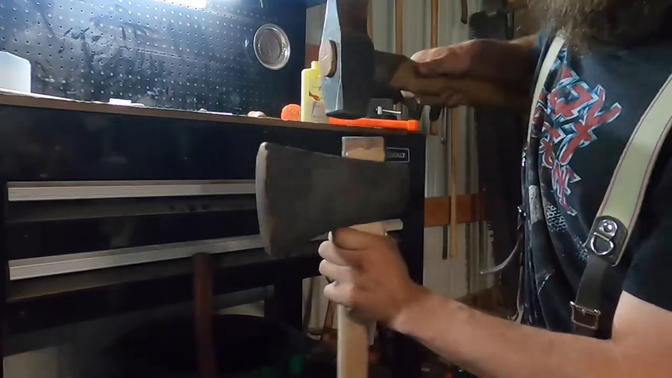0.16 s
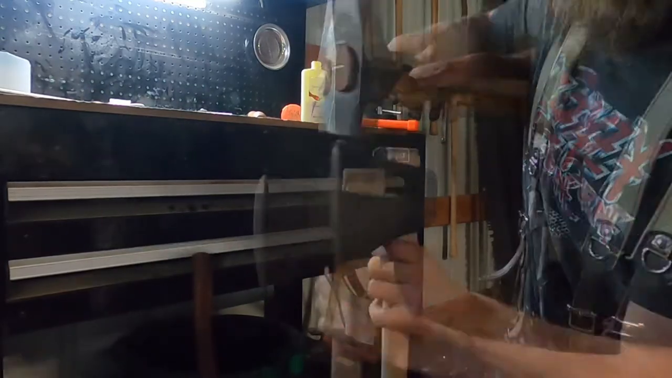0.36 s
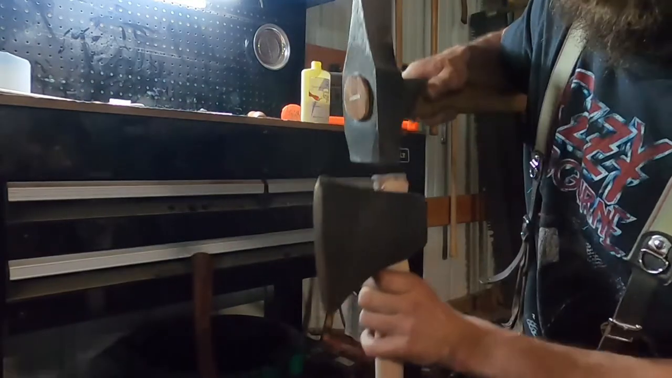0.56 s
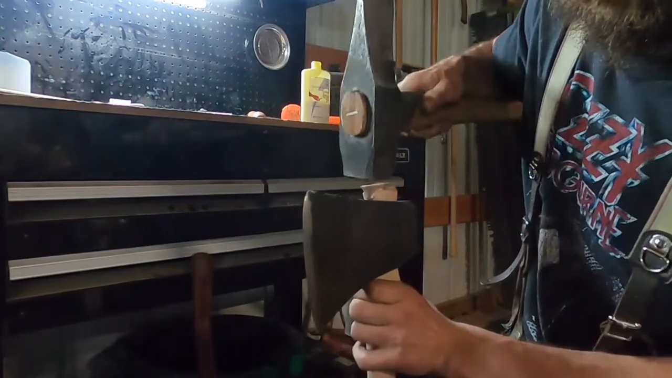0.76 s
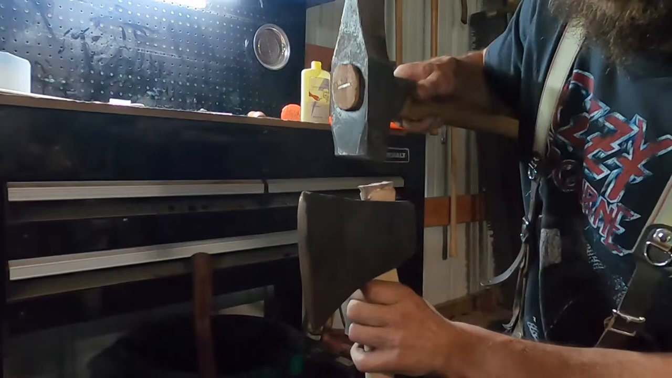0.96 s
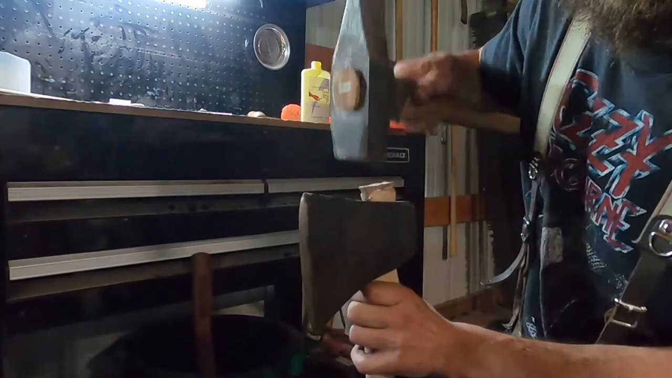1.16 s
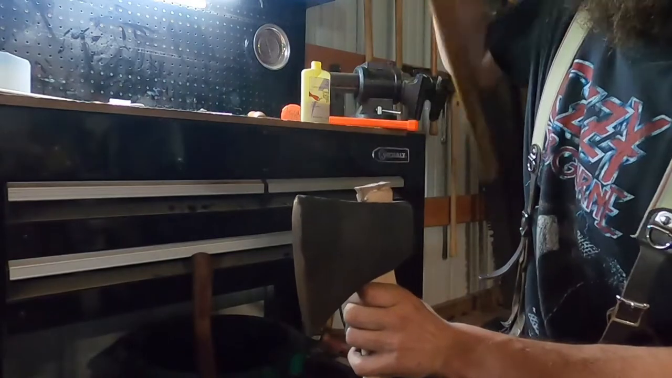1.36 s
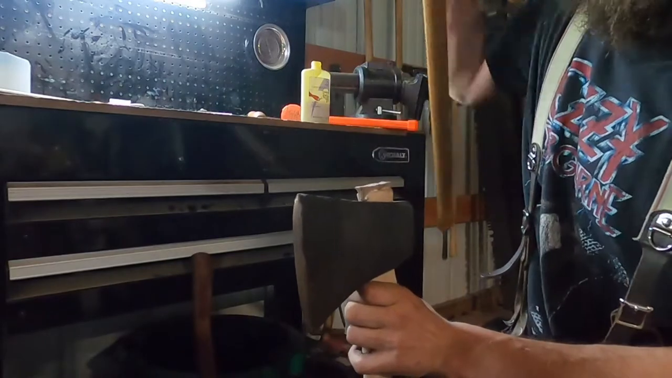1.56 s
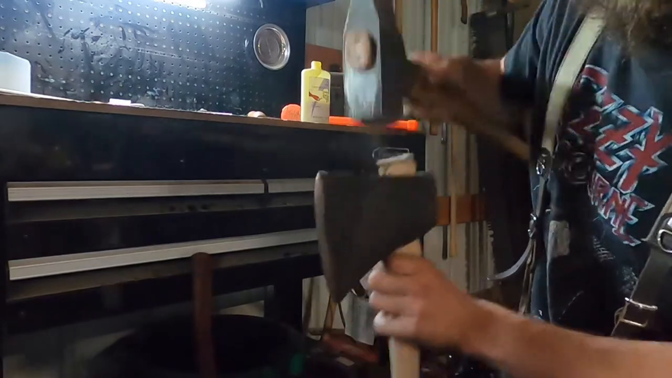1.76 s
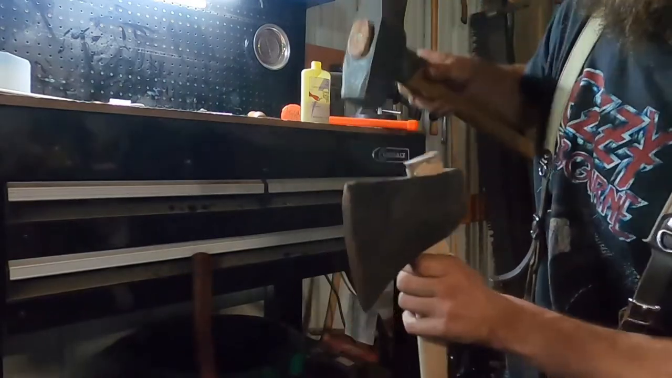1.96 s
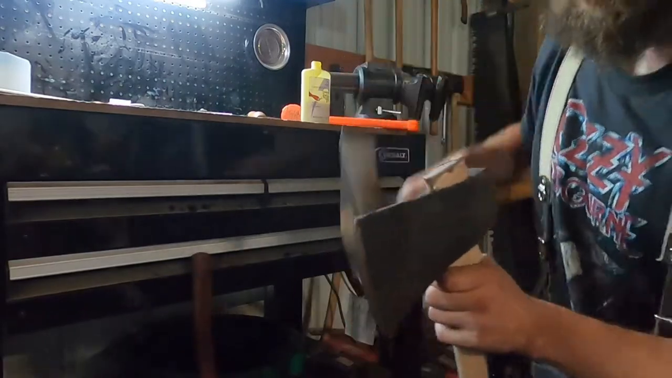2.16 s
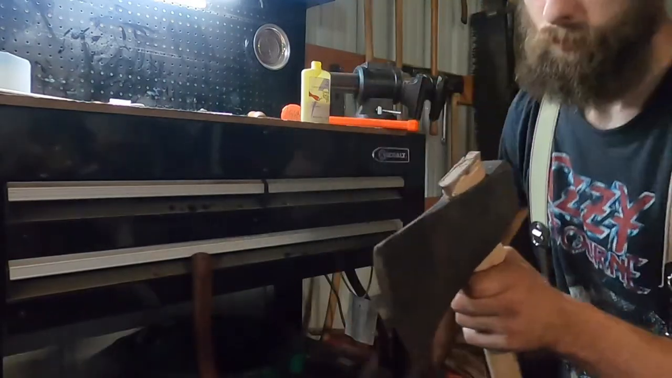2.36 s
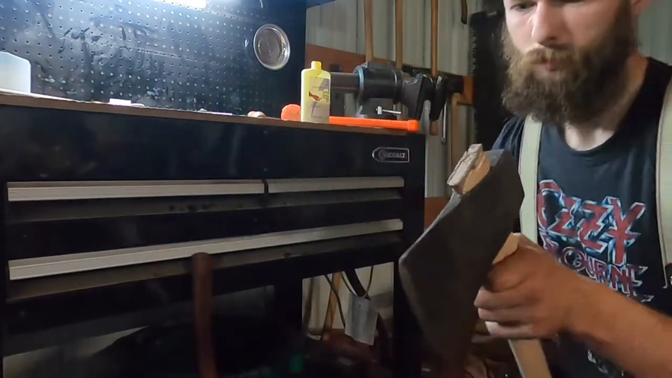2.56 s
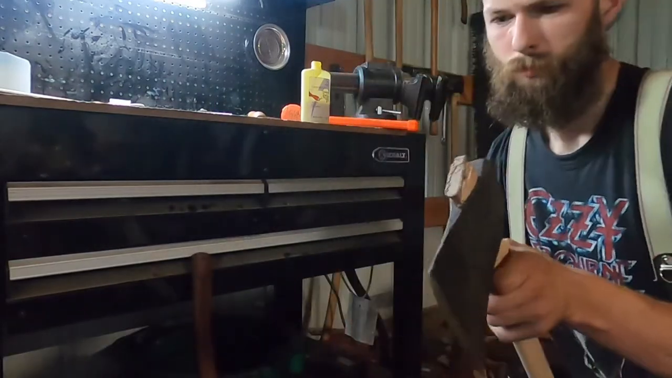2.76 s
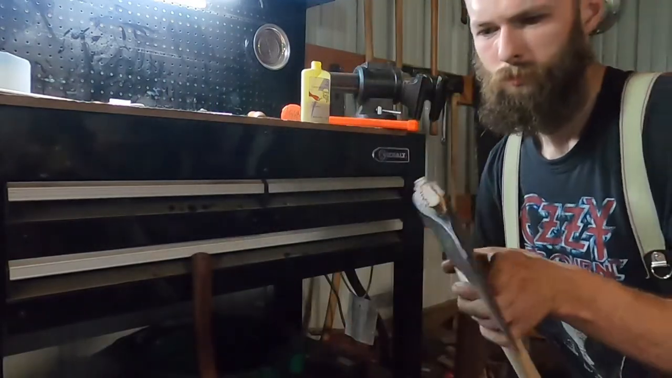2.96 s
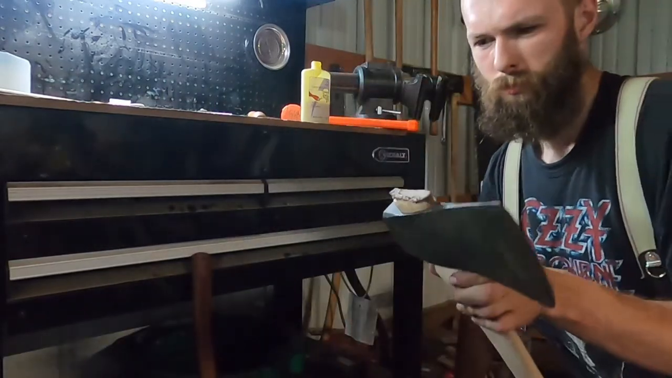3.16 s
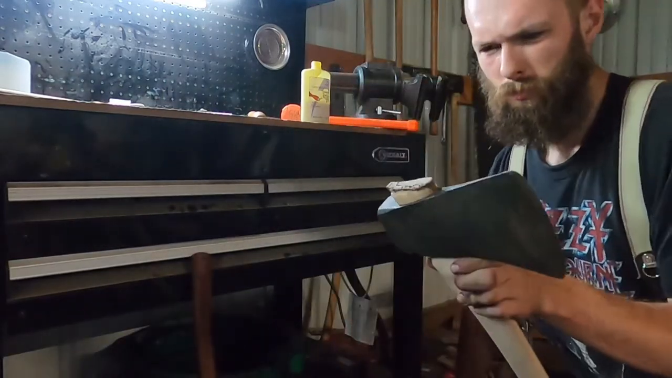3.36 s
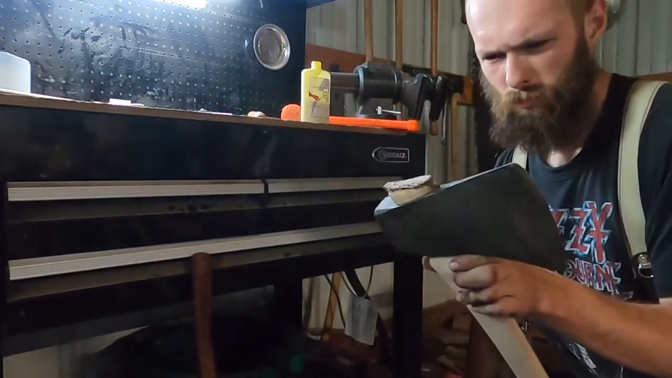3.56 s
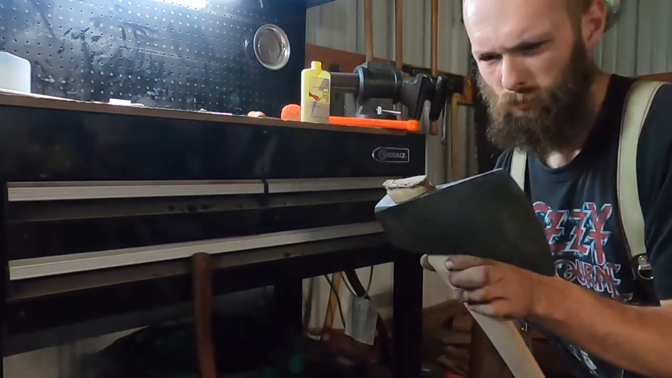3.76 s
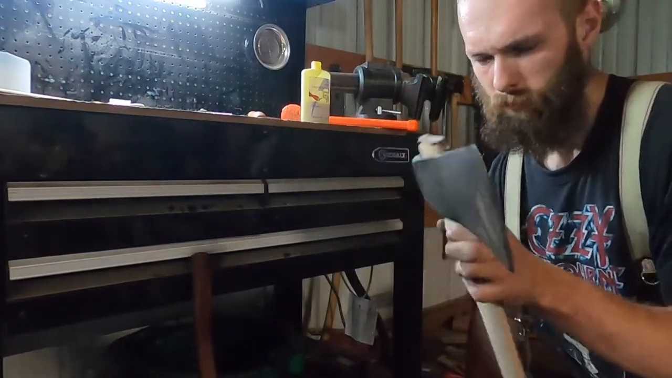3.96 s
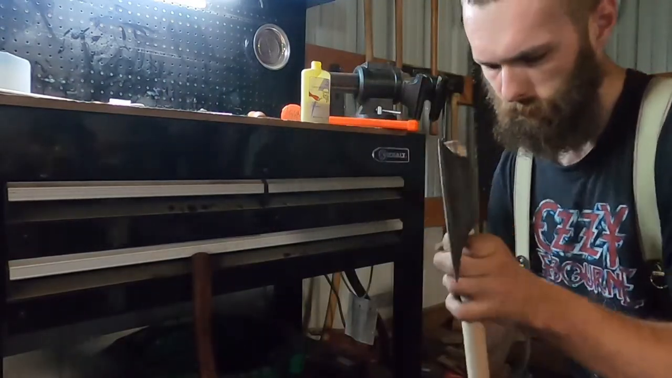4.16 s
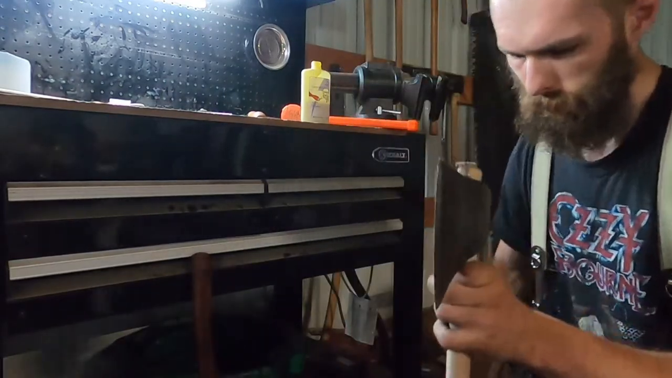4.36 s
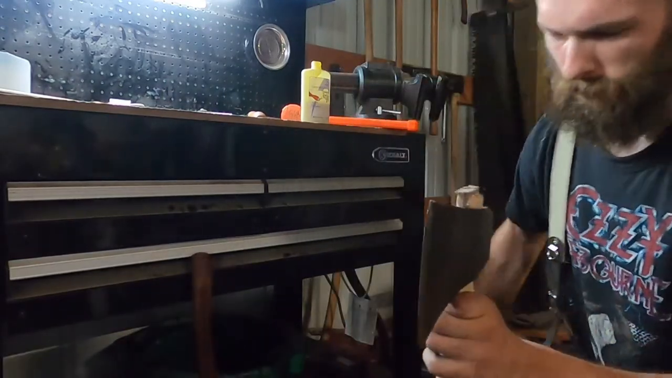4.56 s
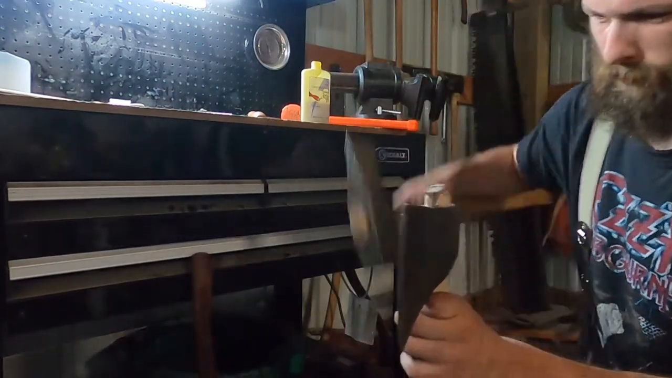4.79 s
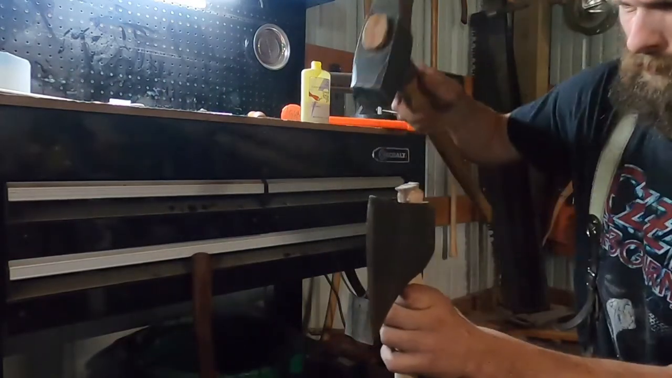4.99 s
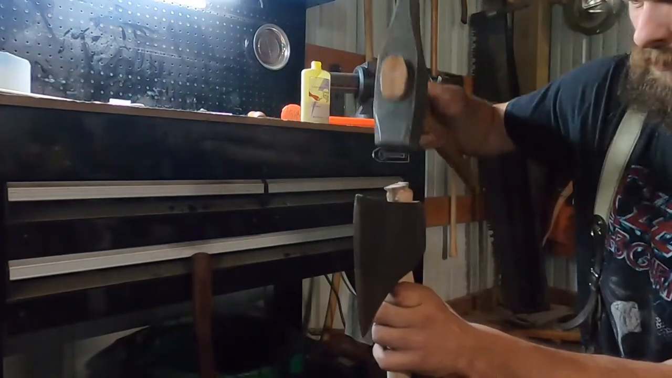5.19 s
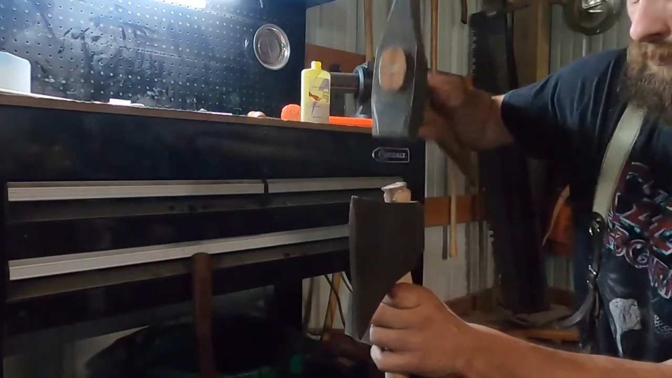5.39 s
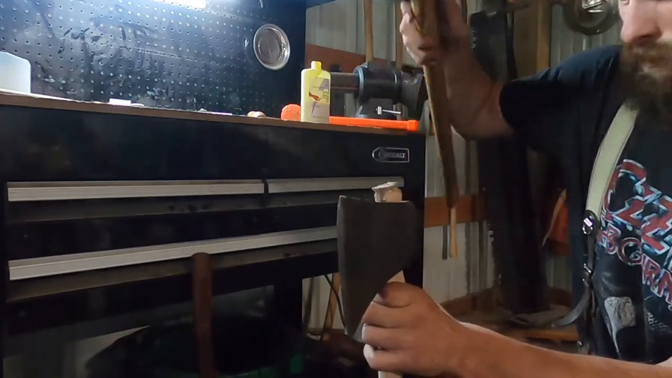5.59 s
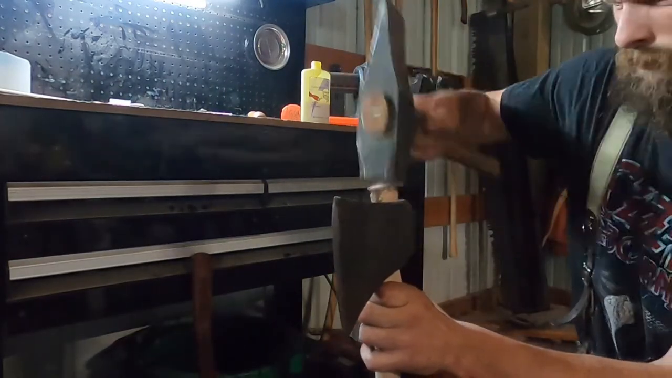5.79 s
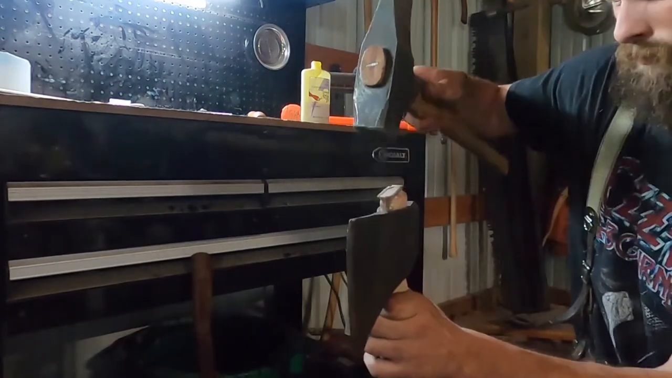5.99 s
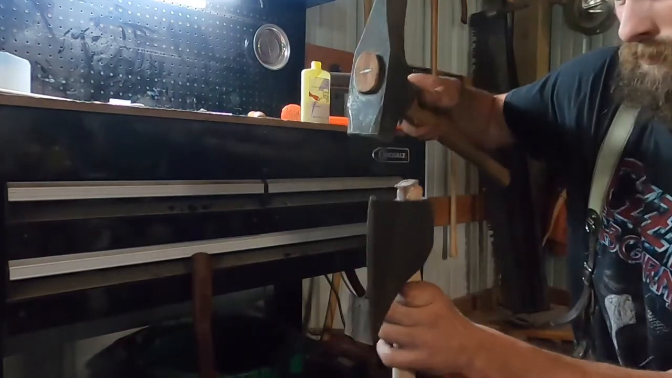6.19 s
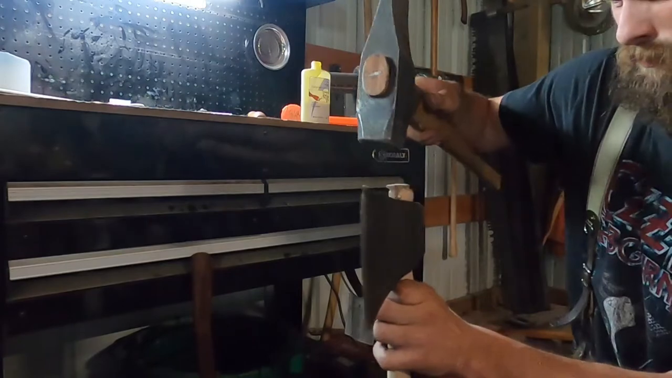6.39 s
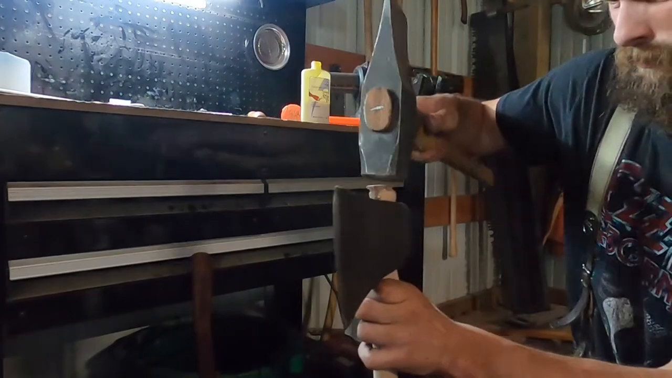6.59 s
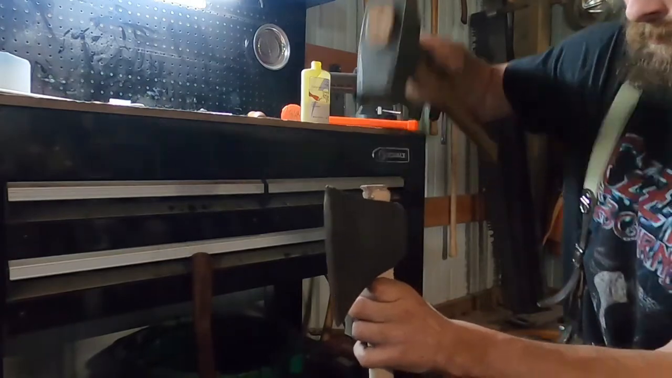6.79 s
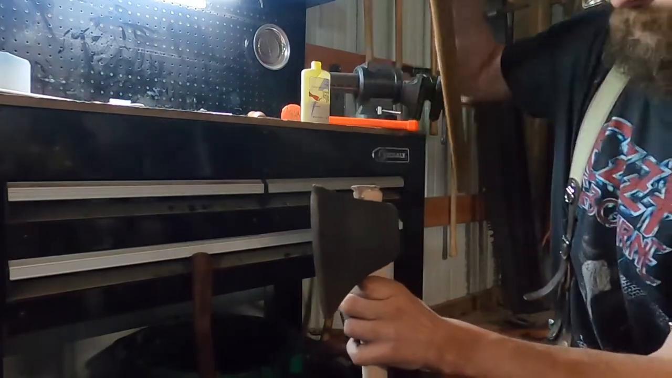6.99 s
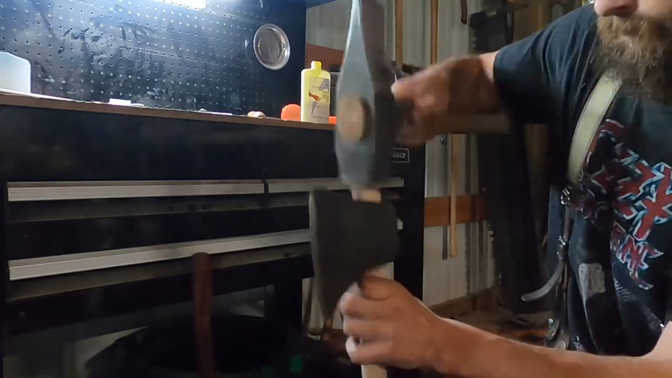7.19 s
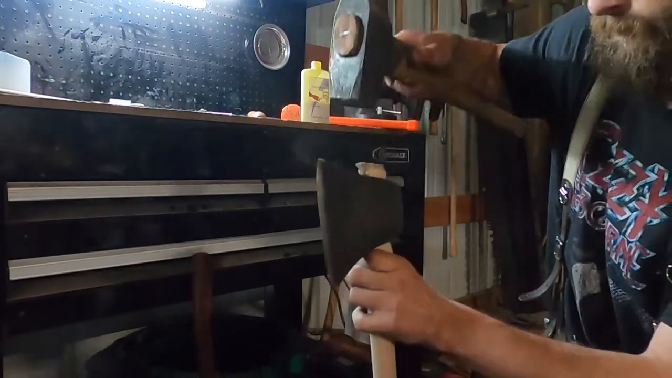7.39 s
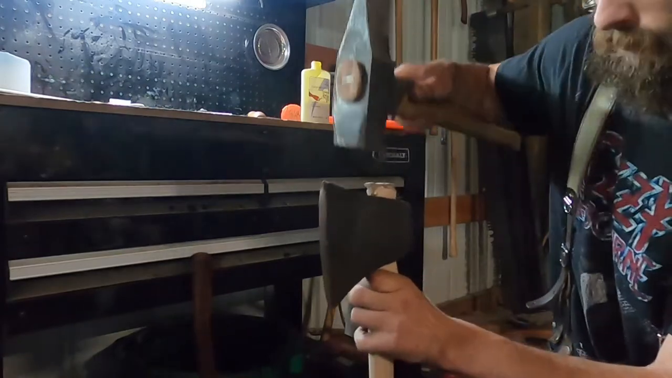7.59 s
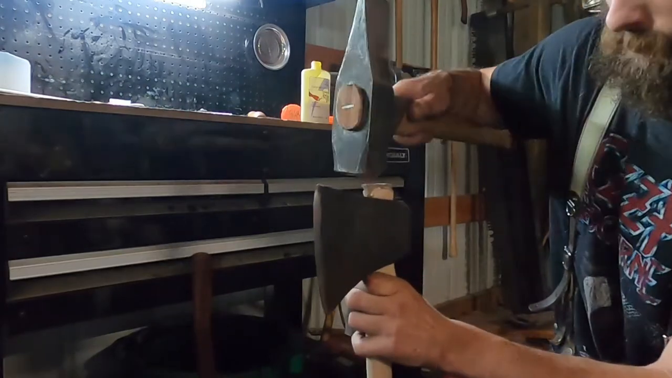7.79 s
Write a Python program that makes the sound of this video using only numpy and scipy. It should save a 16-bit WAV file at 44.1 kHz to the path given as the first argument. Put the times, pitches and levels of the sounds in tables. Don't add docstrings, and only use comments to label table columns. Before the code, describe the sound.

A steel hammer cracks hard onto a wooden wedge with a quick softer rebound, then strikes again sharply; the metal-walled shed rings and rattles. In the quiet middle, hands rub the wood and small ticks sound. The handle knocks dully on the floor, then two more loud, woody blows follow, with a last dull knock. A low fan hums throughout, close to a small camera microphone.

```python
import sys
import numpy as np
from scipy import signal
from scipy.fft import rfft, irfft, next_fast_len
from scipy.io import wavfile
from scipy.ndimage import uniform_filter1d, minimum_filter1d

SR = 44100
rng = np.random.default_rng(int(sys.argv[2]) if len(sys.argv) > 2 else 0)


def gain_from_decibels(decibels):
    exponent = np.asarray(decibels, float) / 20
    return 10 ** exponent


def transcribe(signal):
    frames = np.atleast_2d(signal).T
    limited = np.clip(frames, -1, 1)
    pcm = np.round(limited * 32767).astype(np.int16)
    wavfile.write(sys.argv[1], SR, pcm)


N = 345744

# (time [s], peak [dB], knock pitch [Hz], brightness [0-1], room [dB])
BLOWS = [
    (0.0779, 1, 851, 0.63, -14.5),
    (0.3098, -12, 850, 0.68, -15),
    (1.773, -2, 860, 0.78, -10),
    (5.8886, -4.5, 553, 0.58, -14),
    (7.2965, -4, 930, 0.69, -13),
]
# (time [s], peak [dB], knock pitch [Hz], brightness [0-1], room [dB])
KNOCKS = [
    (3.206, -23, 326.6, 0.16, -35.5),
    (4.594, -8.5, 412.4, 0.39, -28),
    (5.366, -9, 439, 0.11, -26.5),
    (7.800, -11.5, 479, 0.085, -33),
]


def evened(x):
    return x / np.sqrt(np.mean(x ** 2) + 1e-20)


def read(points, hz):
    f, value = np.transpose(points)
    return np.interp(np.log(hz + 1), np.log(f + 1), value)


def add(mix, s, sound):
    part = mix[:, max(round(s * SR), 0):][:, :sound.shape[-1]]
    part += sound[..., :part.shape[1]]


def wander(shape, size):
    once = uniform_filter1d(rng.standard_normal(shape), size=size)
    return evened(uniform_filter1d(once, size=size))


def lumps(hz, t, bins, frames):
    field = rng.standard_normal((np.size(t), np.size(hz))).T
    return evened(uniform_filter1d(uniform_filter1d(field, bins, 0), frames, 1))


def bump(hz, centre_hz, octaves, db):
    return -db * (np.log2((hz + 1) / centre_hz) / octaves) ** 2


def noise(size, db_at):
    # (frequency [Hz], likeness [0-1])
    likeness = [(60, 0.94), (180, 0.97), (350, 0.94), (700, 0.73), (1400, 0.6), (2800, 0.63), (5600, 0.65),
                (10000, 1)]
    # (frequency [Hz], level [dB])
    side_lean = [(60, 1), (300, -0.5), (1400, 2.5), (2800, 2), (5600, -4), (8500, -1), (13000, -4)]
    hz = np.fft.rfftfreq(1024, 1 / SR)[:, None]
    t = np.arange(size // 256 + 2) * 256 / SR
    a, b, c, d = rng.standard_normal((len(t), 513, 4)).T
    shared, other = a + 1j * b, c + 1j * d
    same = np.clip(read(likeness, hz), -1, 1)
    lean = gain_from_decibels(read(side_lean, hz) / 2)
    z = np.array([shared * lean, (same * shared + np.sqrt(1 - same ** 2) * other) / lean])
    return signal.istft(z * gain_from_decibels(db_at(hz, t)), nperseg=1024, noverlap=768)[1][:, :size]


def band(size, hz, octaves):
    return evened(noise(size, lambda f, t: np.maximum(bump(f, hz, octaves, 7.8), -90)))


def dying_band(hz, octaves, db, t60):
    t = np.arange(32768) / SR
    return band(len(t), hz, octaves) * gain_from_decibels(db - 60 * t / t60) * np.minimum(t / 0.004, 1)


def mode(hz, db, t60, rise):
    t = np.arange(SR) / SR
    return gain_from_decibels(db - 60 * t / t60) * np.sin(2 * np.pi * hz * t) * (1 - np.exp(-(t / rise) ** 2))


def tail(colour, db):
    # (frequency [Hz], t60 [s])
    shed = [(50, 0.47), (200, 0.71), (700, 0.78), (2000, 0.76), (5000, 0.75), (10000, 0.61)]

    def decay(hz, t):
        favoured = 2.5 * lumps(hz, t, 2, 40)
        return colour(hz) + favoured - 60 * t / np.clip(read(shed, hz), .1, 2)

    x = noise(SR, decay)
    rise = 1 - np.exp(-(np.arange(SR) / SR / 0.0089) ** 2)
    return gain_from_decibels(db) * x / np.sqrt(np.mean(x[:, :2048] ** 2)) * rise


def hit(mix, s, peak_db, hz, bright, room_db, thump_db, sag, last, echo_db, treble_db=0):
    # (frequency [Hz], density [dB per Hz])
    sharp = [(18, -37.5), (30, -1), (65, -12), (140, -11), (380, -23), (640, -9.5), (950, -9), (1310, -19),
             (2020, -20), (3200, -27), (4200, -39), (6300, -46), (10000, -70), (15000, -89.5)]
    # (frequency [Hz], density [dB per Hz])
    dull = [(18, -39.5), (30, -10), (90, 3.5), (470, -9), (740, -32.5), (1120, -30.5), (1560, -35.5),
            (3200, -46), (5000, -55.5), (8000, -74.5), (15000, -100)]
    # (frequency [Hz], width [octaves], level [dB])
    held = [(527, .04, 2), (674, 0.043, 3), (757, 0.077, 3), (903, 0.036, 3.5), (1000, 0.025, 3),
            (1170, 0.044, 3), (1545, 0.033, 2.5), (1722, 0.034, 2.5), (1955, .015, 6), (2240, 0.013, 2.5),
            (2450, .04, 2.5), (2880, 0.019, 4)]
    # (frequency [Hz], level [dB], t60 [s])
    boards = [(48.1, -20, 0.7), (86.8, -1, 0.21), (122, -8, 0.28), (181.8, -11.5, 0.36)]
    # (delay [s], level [dB])
    reflections = [(.0045, -14), (.0085, -12), (.0235, -9), (.031, -17), (.046, -15)]
    bright, t = np.clip(bright, 0, 1), np.arange(2048) / SR

    def colour(f):
        return bright * read(sharp, f) + (1 - bright) * read(dull, f)

    def room_colour(f):
        ridges = sum(db * gain_from_decibels(bump(f, centre, octaves, 6.2)) for centre, octaves, db in held)
        return colour(f) + bright * ridges

    def grit(tilt_db):
        def slope(f, _):
            treble = treble_db * np.log2(np.maximum(f / 4000, 1))
            return colour(f) + tilt_db * np.log2(f / 1000 + 0.019) + treble
        return evened(noise(2048, slope))

    snap = grit(2.0) * gain_from_decibels(-28 + 21 * bright) * np.minimum(t / 0.0006, 1) * np.exp(-t / 0.0074)
    late = t - .0028 - 1.15 / hz
    crunch = grit(2.5) * gain_from_decibels(-16 + 10 * bright) * np.exp(-abs(late) / np.where(late < 0, .002, .006))
    early = np.minimum(late, 0)
    cycles = hz * (early - 120 * bright * early ** 2) + np.log1p(sag * hz * (late - early)) / sag
    spread = np.where(late < 0, 0.6 / hz + 0.00051 * bright ** 2, last / hz)
    knock = -np.cos(2 * np.pi * cycles) * np.exp(-(late / spread) ** 2) * np.minimum(t / .0004, 1)
    sides = gain_from_decibels([[-1], [1]])
    direct = gain_from_decibels(peak_db - 3.0) * (snap + crunch + knock) * sides
    out = tail(room_colour, room_db)
    add(out, 0, direct)
    add(out, .0068, sum(mode(f, room_db + thump_db + db, t60, 0.0023) for f, db, t60 in boards))
    for delay, db in reflections:
        softened = signal.lfilter([.3], [1, -.7], direct[::rng.choice([-1, 1])])
        add(out, delay, gain_from_decibels(db + echo_db + 2.5 * bright) * softened)
    add(mix, s - .0012 - .55 / hz, out)


def air():
    # (frequency [Hz], density [dB per Hz])
    wash = [(15, -38.5), (30, -9.5), (59, 1), (110, -16.5), (190, -16), (273, -31.5), (600, -43),
            (875, -45.5), (1050, -37.5), (1580, -46.5), (3300, -57.5), (5000, -52), (6300, -62),
            (10000, -75)]
    awake_db, still_db, sink_db_per_s = 8, 2, 16.5
    hits = np.sort([0] + [row[0] for row in BLOWS + KNOCKS[1:]])

    def colour(hz, t):
        since = t - hits[np.searchsorted(hits, t, "right") - 1]
        raised = np.clip(awake_db - sink_db_per_s * since, still_db, 4)
        return read(wash, hz) + 2.2 * lumps(hz, t, 10, 16) + raised * np.clip(hz / 250 - .4, 0, 1)

    return gain_from_decibels(-49) * evened(noise(N, colour))


def hum():
    # (time [s], level [dB])
    load = [(0.0, -66), (0.15, -33), (0.63, -42), (0.9, -46), (1.7, -44), (2.0, -39), (2.5, -49),
            (2.71, -41), (3.14, -47.5), (3.43, -37), (3.65, -43), (4.4, -36), (4.65, -47.5), (4.82, -35.5),
            (5.92, -35), (6.44, -41.5), (7.0, -45), (7.45, -41)]
    # (frequency [Hz], level [dB])
    shaft = [(76, -8), (183, -23)]
    s, db = np.transpose(load)
    x = rng.standard_normal(N)
    for _ in range(2):
        x = signal.lfilter(*signal.iirpeak(76, 6.0, SR), x)
    waver_hz = 1.2 * wander(N, 6000)
    tones = sum(gain_from_decibels(tone_db) * np.sin(2 * np.pi * np.cumsum(hz + waver_hz) / SR) for hz, tone_db in shaft)
    return (gain_from_decibels(-10.0) * evened(x) + tones) * gain_from_decibels(np.interp(np.arange(N) / SR, s, db))


def late_swells(mix):
    # (time [s], frequency [Hz], width [octaves], level [dB], t60 [s])
    answers = [(.36, 1097, 0.99, -23, 0.49), (.38, 600, .3, -25.5, 0.65), (1.82, 900, .3, -27, .5),
               (.6, 1270, .3, -41.5, 0.74), (5.9, 1080, .2, -27, .5), (1.74, 780, .15, -24, .5),
               (7.26, 790, .15, -26, .5), (1.76, 62, .5, -24, .7), (7.28, 60, .5, -26, .7),
               (.07, 65, .5, -28, .7), (6.62, 65, .6, -40, .9)]
    swell = np.minimum(np.arange(32768) / SR / .12, 1) ** 2
    for s, *resonance in answers:
        add(mix, s, dying_band(*resonance) * swell)


def steel_blows(mix):
    thumps = [10.5, 10.3, 10.5, 9.9, 10.5]
    trebles = [0.5, 0.5, 0.5, 0.5, -12]
    for row, thump_db, treble_db in zip(BLOWS, thumps, trebles):
        hit(mix, *row, thump_db, sag=.15, last=.92, echo_db=0, treble_db=treble_db)


def bending_waves(mix):
    # (time [s], length [s], first pitch [Hz], last pitch [Hz], level [dB])
    whistles = [
        (0.0768, .0024, 3410, 1910, -20),
        (.3080, 0.0047, 4620, 1000, -20.5),
        (1.771, .0036, 3980, 1297, -22),
        (5.8873, .0040, 3250, 1296, -29.5),
        (7.295, 0.004, 2504, 1099, -16.5),
    ]
    lowpass = signal.butter(4, 5800, fs=SR, output="sos")
    for s, length, first_hz, last_hz, db in whistles:
        u = np.arange(round(length * SR)) / (length * SR)
        wobble = wander((2, 512), 14)[:, :len(u)]
        turns = np.cumsum(first_hz * (last_hz / first_hz) ** u * (1 + .12 * wobble[0])) / SR
        level = gain_from_decibels(db + 3.0 * wobble[1] + 3.0 * u)
        whistle = -level * np.sin(2 * np.pi * turns) * signal.windows.tukey(len(u), .4)
        add(mix, s, signal.sosfilt(lowpass, np.pad(whistle, (0, 64))))


def rings_and_rattles(mix):
    # (time [s], frequency [Hz], width
    # [octaves], level [dB], t60 [s])
    ringing = [(.077, 5060, 0.023, -45, 0.45), (.311, 5030, .04, -52, 0.6), (.309, 5310, .012, -52.5, 1),
               (.311, 1960, .02, -36, 0.9), (.078, 684, 0.089, -27, .7), (0.28, 689, .05, -29.5, 0.96),
               (5.89, 684, .05, -29, .7), (7.297, 727, .07, -27, .7), (1.775, 900, .06, -24, .7),
               (1.775, 1500, .02, -35, .7), (7.297, 1800, .02, -30, 0.85), (1.799, 2950, .06, -28, .05),
               (5.893, 7010, .01, -47.5, 0.46), (5.893, 6680, .01, -48, .5),
               (1.139, 2840, 0.21, -39.5, 0.087), (4.593, 2450, .05, -39.5, 0.094),
               (1.138, 690, .04, -41, 0.19), (1.138, 1300, .12, -34.5, 0.063), (1.2, 1990, .03, -57, 0.45),
               (3.218, 1125, .05, -55, 0.13), (3.218, 1430, 0.078, -54, .15),
               (4.593, 1762, 0.02, -42, 0.43), (4.591, 1924, 0.025, -42, 0.22),
               (4.593, 2800, 0.09, -59, .35), (4.593, 2270, .03, -52.5, 0.67), (4.593, 1290, .03, -50, 0.3),
               (4.593, 1075, .025, -41, 0.42), (4.593, 1160, .025, -43.5, 0.49),
               (4.593, 640, .05, -43.5, 0.59), (5.893, 6800, 0.072, -37.5, 0.51),
               (5.89, 1950, .04, -34.5, .6), (6.407, 2900, .04, -63, 0.38), (6.407, 5670, 0.052, -65, 0.27),
               (6.486, 1600, .03, -68, 0.35), (7.296, 1650, 0.085, -23.5, 0.27),
               (6.649, 1900, .025, -58.5, 0.35), (6.649, 1123, 0.057, -46.5, 0.22),
               (0.078, 7020, 0.34, -53.5, 0.61), (.309, 2240, 0.51, -28.5, 1), (0.311, 6280, 0.45, -60, 1),
             (1.77, 8400, 0.25, -50, 0.62), (1.775, 820, 0.17, -20.5, 0.57), (7.298, 903, 0.18, -21, 0.61),
             (7.296, 2740, 0.41, -28, 0.053), (2.06, 6340, 0.35, -63, 0.99), (5.366, 656, 0.17, -37, 0.56),
             (5.366, 2580, 0.44, -47, 0.28), (5.38, 8640, .4, -73, 0.4), (5.89, 11400, 0.15, -56, 0.49),
             (5.89, 8580, .15, -55, 0.52), (6.484, 6660, 0.31, -62, 0.37), (6.654, 3540, 0.73, -50, 0.15)]
    for s, *resonance in ringing:
        add(mix, s, dying_band(*resonance))


def pings(mix):
    # (time [s], frequency [Hz], level [dB], t60 [s])
    touches = [(4.5976, 130, -22, 0.041), (5.370, 125, -18, 0.052), (7.8035, 130, -21, 0.056),
               (.0795, 277, -14, 0.058), (5.8923, 270, -16.5, .04), (1.139, 398, -27.5, 0.048),
               (6.652, 400, -31.5, 0.042), (7.619, 420, -23.5, 0.029), (2.4185, 1700, -28.5, 0.011),
               (2.4183, 2900, -32.5, 0.011), (2.918, 4600, -60, .06), (6.406, 3770, -54, .1),
               (6.41, 2550, -56, .15), (6.412, 6100, -57, .05), (6.485, 1950, -53, 0.14),
               (6.485, 2590, -54, .06), (6.485, 3650, -52, .05), (6.486, 5600, -52, .03),
               (6.488, 6700, -56, .05), (6.6601, 2700, -44, 0.035), (.077, 5090, -30, .03),
               (3.0763, 3120, -51, .03), (4.593, 2200, -32, .02), (4.596, 635, -34, .14),
               (4.596, 1157, -42, .35), (4.596, 1985, -44, .2), (1.140, 1270, -33, .04),
               (1.140, 2620, -38, .04), (1.141, 700, -36, .08), (6.652, 1150, -40, .03),
               (6.652, 650, -38, .04), (5.367, 1150, -30, .015), (1.7722, 12500, -52, .012)]
    for s, hz, db, t60 in touches:
        add(mix, s, mode(hz, db, t60, .0002 + .12 / hz)[:16384])


def handle_modes(mix):
    # (frequency [Hz], level [dB], t60 [s])
    wood = [(512, -13, 0.066), (800, -13, 0.08), (900, -14, .05), (1190, -23, 0.044), (1720, -16, 0.055),
            (1930, -16, 0.04), (2500, -22.5, 0.037), (2790, -23, 0.048)]
    for s, peak_db, *_ in BLOWS:
        add(mix, s + .001, sum(mode(hz, peak_db + db, t60, 0.00064) for hz, db, t60 in wood))


def clear_tones(mix):
    # (time [s], frequency [Hz], level [dB], t60 [s])
    singing = [(3.215, 842, -45, 0.45), (3.217, 885, -45, 0.27), (4.594, 1762, -46, 0.68),
               (4.594, 1918, -46, .3), (4.594, 1600, -53, .4), (4.594, 2089, -54, .5),
               (4.594, 2422, -49, .2), (4.594, 1160, -47, 0.45), (0.29, 1955, -34.5, .9),
               (1.139, 689, -45, .25), (6.66, 2050, -58, .35), (6.658, 1200, -43, .07),
               (6.656, 2700, -52, .1), (1.139, 1300, -37, 0.058), (1.139, 2650, -44, .06)]
    for s, hz, db, t60 in singing:
        beat_db = 3.5 * wander((2, SR), 900)
        add(mix, s, mode(hz, db, t60, .004) * gain_from_decibels(beat_db))


def soft_thuds(mix):
    # (time [s], peak [dB], knock pitch [Hz], brightness [0-1], room [dB])
    bumps = [
        (.6975, -25, 262, 0.073, -49),
        (7.618, -19, 300, 0.048, -44.5),
    ]
    for row in bumps:
        hit(mix, *row, thump_db=-0.5, sag=1.1, last=1.85, echo_db=-8.5)


def rubbing_hands(mix):
    # (time [s], length [s], level [dB], centre [Hz], place of the peak [0-1])
    rubs = [(0.975, 0.19, -69.5, 2870, 0.4), (1.198, 0.4, -61, 3060, 0.24), (2.146, 0.51, -57, 2600, 0),
            (2.41, 0.19, -58.5, 2610, 0.07), (2.52, 0.12, -54, 3050, .4), (2.601, 0.33, -61, 2840, 0.4),
            (2.84, 0.28, -69, 3000, 0.41), (3.068, 0.126, -57.5, 3060, 0.22),
            (3.186, 0.17, -63, 3000, 0.15), (3.298, 0.5, -68, 3600, 0.45), (3.829, 0.25, -76.5, 2896, 0.44),
            (4.039, 0.29, -64.5, 2530, 0.21), (4.699, 0.45, -62.5, 2920, 0.37),
            (5.078, .16, -79, 2690, 0.4), (5.458, 0.35, -84.5, 2400, 0.6), (6.403, 0.074, -61, 3200, 0.26),
            (6.474, .12, -61.5, 2900, 0), (6.682, 0.3, -63.5, 2450, 0.09), (6.795, 0.37, -65.5, 3170, 0.44),
            (7.151, 0.18, -78.5, 2700, 0.5)]

    def scuff(hz, t):
        return bump(hz, 900, 1.6, 3.2) - hz / 500 - 0.5

    for s, length, db, centre_hz, peak in rubs:
        def rub(hz, t):
            body = np.maximum(bump(hz, centre_hz, 1.234, 20.4), -60)
            grain = 4 * gain_from_decibels(bump(hz, 1.07 * centre_hz, 0.13, 8.8))
            return body + grain + 2.5 * lumps(hz, t, 6, 8)

        size = round(length * SR)
        x = noise(size, rub)
        x = (x + noise(size, scuff)) / np.sqrt(uniform_filter1d((x ** 2).mean(0), 4096) + 1e-20)
        slips = gain_from_decibels(1.8 * evened(uniform_filter1d(rng.standard_normal(size), 160)))
        u = np.arange(size) / size
        warped = u ** (np.log(.5) / np.log(np.clip(peak, .05, .95)))
        swell = abs(np.sin(np.pi * warped)) ** 1.2
        add(mix, s, x * evened(slips) * gain_from_decibels(db) * swell)


def insects(mix):
    # (time [s], length [s], level [dB])
    bursts = [
        (1.012, 0.1, -87),
        (1.604, 0.23, -83),
        (3.77, 0.29, -82.5),
        (4.345, 0.12, -80.5),
        (5.083, .27, -85.5),
        (5.601, 0.19, -86),
        (7.181, 0.2, -87),
    ]
    for s, length, db in bursts:
        size = round(length * SR)
        add(mix, s, band(size, 5280, 0.061) * gain_from_decibels(db) * signal.windows.tukey(size, .3))


def wood_taps(mix):
    # (time [s], peak [dB], knock pitch [Hz], brightness [0-1], room [dB])
    taps = [
        (1.1376, -17.5, 230, 0.55, -42.5),
        (6.650, -19, 235, 0.3, -44.5),
    ]
    for row in taps:
        hit(mix, *row, thump_db=8.5, sag=1, last=1.35, echo_db=-10)


def small_ticks(mix):
    # (time [s], peak [dB], pitch [Hz], room [dB])
    ticks = [(1.437, -45, 2600, -62.5), (2.418, -32, 1860, -61), (3.0194, -45.5, 3400, -69),
             (3.4864, -49, 1595, -78), (4.0504, -50, 2800, -62.5), (4.3293, -53, 1974, -87),
             (5.784, -58, 4850, -86), (6.4043, -47, 3500, -63), (6.4815, -54, 1846, -77),
             (5.391, -23, 600, -62), (4.592, -26.5, 1300, -62), (4.5925, -31.5, 2300, -62),
             (6.6605, -31, 910, -67), (1.140, -28, 1350, -62), (6.659, -38, 3000, -64),
             (3.225, -38, 820, -70), (7.7124, -33.5, 1750, -58.5)]
    t = np.arange(1024) / SR
    shape = np.exp(-t / 0.005) * np.minimum(t / 0.00061, 1)
    for s, peak_db, hz, room_db in ticks:
        def colour(f, _=0):
            return bump(f, hz, 0.91, 8.8)

        out = tail(colour, room_db)
        add(out, 0, gain_from_decibels(peak_db - 9.0) * evened(noise(1024, colour)) * shape)
        add(mix, s, out)


def floor_knocks(mix):
    for row in KNOCKS:
        hit(mix, *row, thump_db=-2, sag=0.33, last=0.57, echo_db=-3)


def scene():
    mix = air() + hum()
    for source in (late_swells, steel_blows, bending_waves, rings_and_rattles, pings, handle_modes, clear_tones,
                   soft_thuds, rubbing_hands, insects, wood_taps, small_ticks, floor_knocks):
        source(mix)
    return mix


def top_cut(x):
    return signal.sosfilt(signal.butter(12, 14600, fs=SR, output="sos"), x)


def record(dry):
    power_db = 10 * np.log10(signal.lfilter([.004], [1, -.996], (dry ** 2).mean(0)) + 1e-12)
    fall = np.arange(N) * 660.0 / SR
    over_db = np.maximum(np.maximum.accumulate(power_db + fall) - fall + 31.5, 0)
    late = round(0.0047 * SR)
    duck_db = uniform_filter1d(np.pad(over_db, (late, 0))[:N], 256)
    x = dry / gain_from_decibels(0.61 * duck_db)

    low_band = signal.butter(2, [640, 1150], "band", fs=SR, output="sos")
    high_band = signal.butter(2, [1800, 5200], "band", fs=SR, output="sos")
    ahead = gain_from_decibels(4.0) * signal.sosfilt(low_band, x) + gain_from_decibels(-10) * signal.sosfilt(high_band, x)
    ahead *= np.clip(-minimum_filter1d(-over_db, 1024) / 16, 0, 1)
    frame = 462
    for k in range(1, 5):
        x = x + gain_from_decibels(-13.5 * k) * np.pad(ahead[:, k * frame:], ((0, 0), (0, k * frame)))

    x = signal.sosfilt(signal.butter(3, 37, "high", fs=SR, output="sos"), x)
    x = np.tanh(x / 1.067) * 1.567 * np.minimum(np.arange(N) / SR / 0.025, 1)

    lag, lag_edge_hz = 1.4, 8500
    left = np.pad(x[0], (0, next_fast_len(N + 4096) - N), "linear_ramp")
    hz = np.fft.rfftfreq(len(left), 1 / SR)
    turn = np.exp(-2j * np.pi * lag * hz / SR / (1 + (hz / lag_edge_hz) ** 4))
    x[0] = irfft(rfft(left) * turn, len(left))[:N]
    return top_cut(x)


dry = scene()
out = record(dry)
transcribe(out)
```